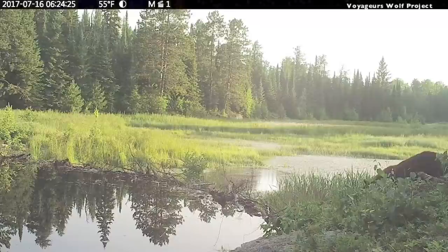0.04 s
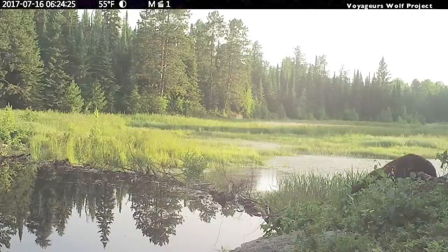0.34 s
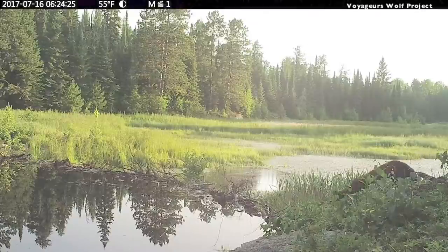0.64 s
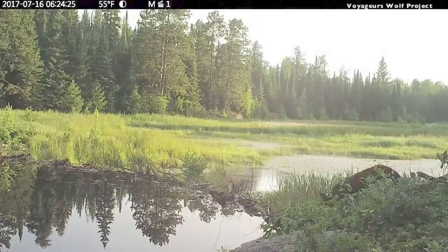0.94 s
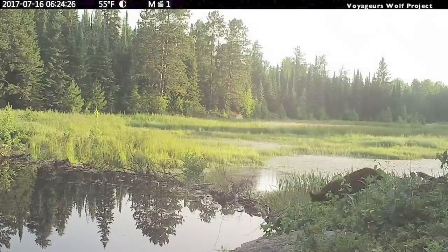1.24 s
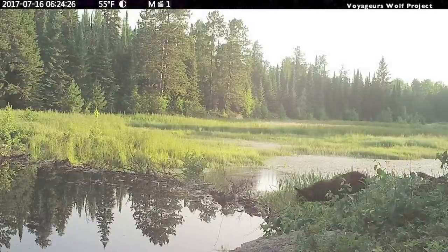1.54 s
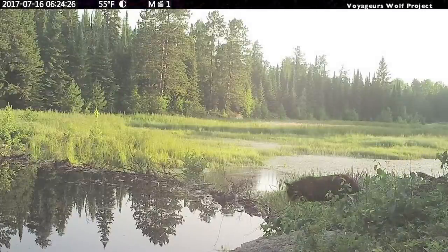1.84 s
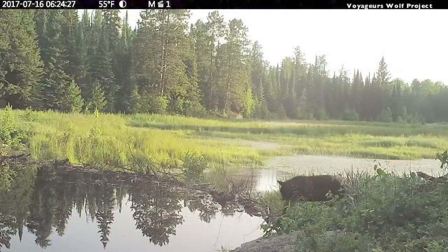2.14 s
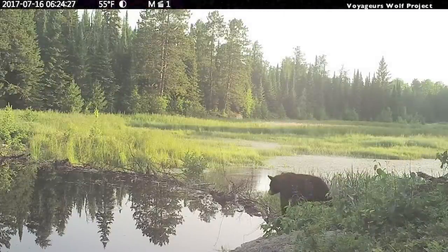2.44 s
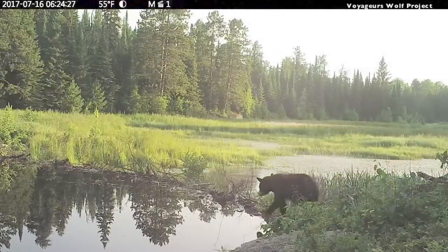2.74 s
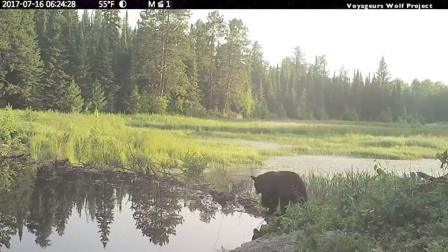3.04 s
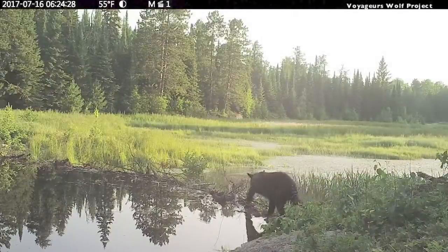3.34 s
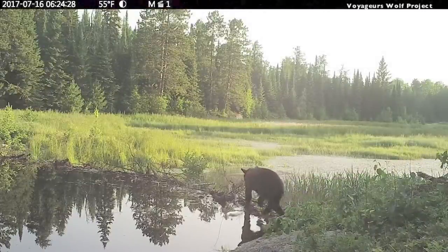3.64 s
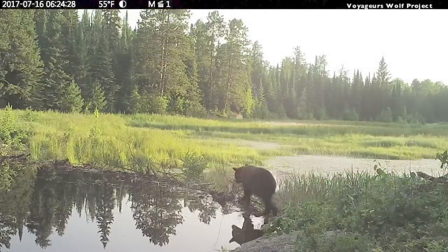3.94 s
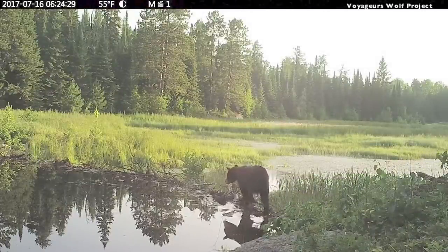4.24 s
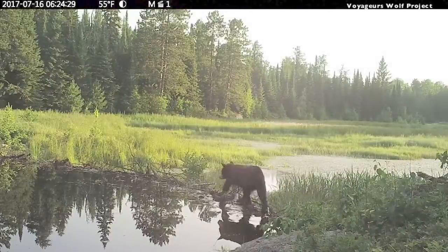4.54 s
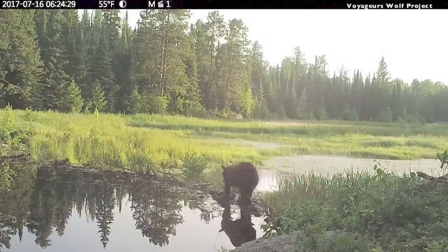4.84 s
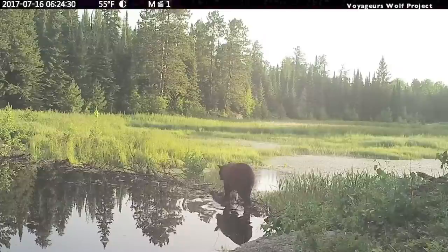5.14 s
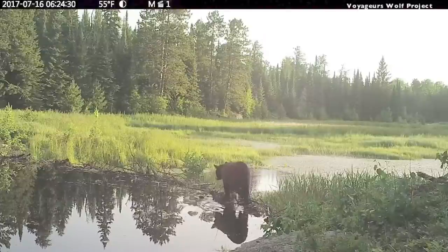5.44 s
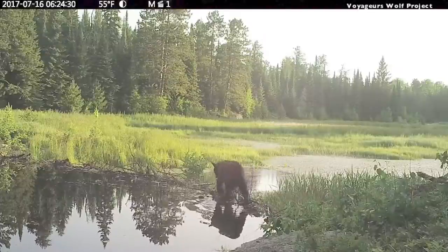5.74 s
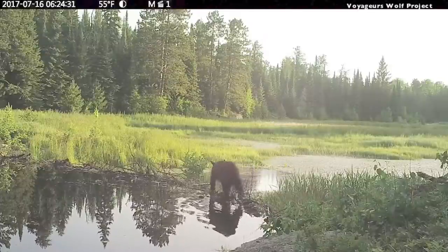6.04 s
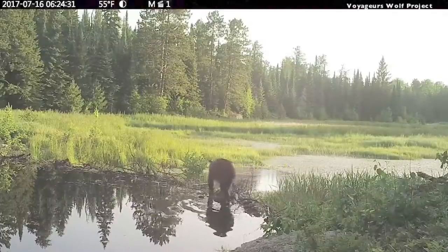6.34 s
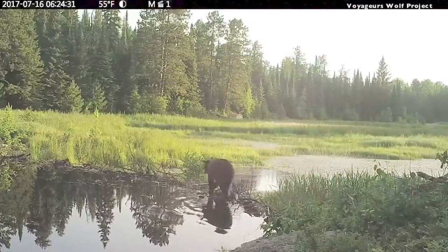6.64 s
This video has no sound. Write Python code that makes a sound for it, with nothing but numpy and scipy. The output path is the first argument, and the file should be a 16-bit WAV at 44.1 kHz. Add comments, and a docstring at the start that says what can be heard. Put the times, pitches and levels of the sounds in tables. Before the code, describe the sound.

A bear pushes through brush and wades into shallow water, with one loud branch crack, rustles and soft plops, as birds chirp over hiss.

```python
"""A branch cracks loudly and the forest answers as a bear pushes through brush into a pond's shallows.
Tearing fibres ring the twigs, stems flick against fur, and paws stir up bubbles and plop in the water.
A small bird twitters very high nearby; another whistles far off, blurred by the trees.
Under it all lie still air and the microphone hiss and faint whine of a small outdoor camera."""
import sys
import numpy as np
from scipy import signal
from scipy.fft import rfft, irfft
from scipy.io import wavfile
from scipy.ndimage import map_coordinates

SR = 44100
rng = np.random.default_rng(int(sys.argv[2]) if len(sys.argv) > 2 else 0)


def store_pcm(level_fs):
    """Save levels as 16-bit WAV."""
    pcm = np.round(np.clip(level_fs, -1, 1) * 32767).astype(np.int16)
    wavfile.write(sys.argv[1], SR, np.atleast_2d(pcm).T)


N = 304290
TIME = np.arange(N) / SR


def snap(level_db, tear_s, body_db, top_db, splinter_db=-8, knock_db=-11, ragged_db=2.5):
    """A ragged burst of a few milliseconds, as when fibres tear unevenly and ring the wood."""
    # wood resonances of the bright crack, before tuning to the twig: pitch_hz, width_hz, gain_db
    crack_modes = [(5445, 590, 1.5), (5370, 510, -3), (6330, 760, 1), (7250, 490, 4.5), (7760, 490, 0)]
    # wood resonances of the low knock: pitch_hz, width_hz, gain_db
    knock_modes = [(1310, 270, -15), (1960, 670, -1.5), (2550, 320, 4.5), (3700, 2100, -6)]
    t = TIME[:2048]
    jerks = np.interp(t, t[::48], rng.standard_normal(len(t[::48])))
    tearing = t / tear_s * np.exp(-t / tear_s) * from_db(ragged_db * jerks)
    fibres = rng.standard_normal((3, len(t))) * tearing
    tuning = (5800 + 23.5 * (-16.5 - level_db)) / 6050  # thinner twigs break more quietly, ring higher
    ring = resonate(fibres[0], crack_modes * np.array([tuning, 1, 1]))
    crack = band(ring + from_db(splinter_db) * fibres[0], 3490, 7370)
    knock = band(resonate(fibres[1], knock_modes) + from_db(knock_db) * fibres[1], 1180, 3800)
    crisp = band(fibres[2], 6200, 14200)
    wood = rms_one(crack) + from_db(body_db) * rms_one(knock) + from_db(top_db) * rms_one(crisp)
    return from_db(level_db) * wood * np.sqrt(0.0043 / t[-1])  # level as if packed into 4.3 ms


def snaps():
    """Sharp cracks, snaps and a splash-like burst that stand out of the rustle."""
    # sharp bursts: start_s, level_db, rise_s, body_db, top_db (the last two relative to level_db)
    bursts = [(1.867, -17, 0.0012, -12.5, -30), (2.4804, -41, .0008, -12, -12),
              (2.5882, -50, 0.00049, -9, -19), (2.739, -51.5, 0.00066, -16, -14),
              (3.403, -52.5, 0.00073, -1.5, -22), (3.4525, -50, .001, -12, -19),
              (3.6382, -45.5, 0.00044, -16, -6), (3.8733, -46.5, .0008, -22, -11),
              (4.194, -35, 0.0056, -11.5, -16), (4.266, -37, .003, -5, -20),
              (4.3862, -46.5, 0.00089, -19, -19), (4.7943, -43.5, .002, -11, -15),
              (4.8903, -45, 0.0011, -6, -4), (4.956, -53.5, .001, 0, -19), (4.9722, -42, 0.0011, -29, -12),
              (5.021, -47.5, 0.0013, -7, -8), (5.1477, -44.5, .0007, -20, -28),
              (5.1528, -41.5, 0.00082, -13, -24), (5.16, -45.5, 0.00064, -15, -19),
              (5.2825, -49, .001, -9, -21), (5.3996, -50, .001, -22, -24), (5.8024, -44, 0.0016, -12, -25),
              (6.1597, -48.5, .0008, -24, -26), (6.234, -50.5, 0.00058, -17, -20),
              (6.3325, -51, 0.0012, -7, -14), (6.659, -45, .0008, -24, -9), (6.725, -45, 0.0026, -13, -15),
              (6.857, -41.5, 0.00058, -12, -7), (6.872, -41.5, 0.00078, -24, -7),
              (6.8947, -35, 0.00052, -8, -9.5)]
    out = np.zeros(N)
    for start_s, level_db, rise_s, body_db, top_db in bursts:
        add(out, start_s, snap(level_db, rise_s, body_db, top_db))
    return panned(out, 0.5)


def rustle():
    """Leaves and stems flick against the fur: a spray of miniature snaps."""
    flicks = grains(per_s=1600, spread_db=4.5)
    ticks = grains(per_s=600, spread_db=4.0)
    leaves = rms_one(band(flicks, 5570, 7620) + from_db(-14.5) * band(flicks, 3300, 11000, order=1))
    stems = rms_one(resonate(ticks, [(2450, 380, -1.4), (3800, 490, -1.9), (4790, 530, 1.5)]))
    return rms_one(leaves + from_db(-6.5) * stems)


def water(slosh_gain, plop_db=6.5, shed_db=-4.5, plop_t60_s=0.045):
    """Single plops over a churn of small bubbles round the legs."""
    # air pockets closing under the paws: start_s, pitch_hz, level_db (before plop_db or shed_db)
    plops = [(4.271, 1100, -45.5), (4.758, 1020, -49), (5.005, 1020, -51), (5.011, 1236, -50),
             (5.023, 1317, -48.5), (5.151, 573, -49), (5.365, 517, -51.5), (5.683, 1136, -57),
             (5.94, 550, -50.5), (5.987, 1100, -55), (6.312, 540, -51.5)]
    churn = resonate(grains(per_s=350, spread_db=6.0), [(508, 76, -3), (1070, 280, -8.5), (1373, 214, -8)])
    out = slosh_gain * rms_one(churn)
    for start_s, pitch_hz, level_db in plops:
        add(out, start_s, from_db(level_db + plop_db) * bubble(pitch_hz, plop_t60_s))
        for late, smallness in rng.random((3, 2)):  # the pocket sheds smaller and larger bubbles
            shed = bubble(pitch_hz * (0.86 + 0.4 * smallness), plop_t60_s / 2)
            add(out, start_s + 0.032 * late, from_db(level_db + shed_db) * shed)
    return panned(out, 0)


def bubble(pitch_hz, t60_s, rise=0.024):
    """A damped tone that rises as the bubble nears the surface."""
    t = TIME[:SR // 8]
    envelope = from_db(-60 * t / t60_s) * (1 - np.exp(-t / .001))
    return envelope * np.sin(2 * np.pi * pitch_hz * t * (1 + rise * t / t60_s))


def gait(reach_s=.6):
    """Gains of rustle and slosh: each step swells over the wading; the water is slower to settle."""
    # paws coming down: peak_s, rustle_db, slosh_db
    steps = [(3.0, -81, -65.5), (3.33, -66, -64.5), (3.79, -55.5, -57.5), (4.23, -53.5, -60.5),
             (4.79, -56, -67), (5.0, -52.5, -77), (5.38, -52, -64), (5.66, -79, -62), (5.9, -79, -66),
             (6.15, -58, -79), (6.3, -64, -64), (6.54, -54, -62), (6.73, -57.5, -62), (6.89, -54, -70)]
    # leaves dragging along fur and water still stirred between steps: time_s, rustle_db, slosh_db
    wading = [(0, -83, -64), (.5, -65, -68), (.8, -73, -67), (1.3, -70, -68.5), (2.3, -80, -73),
              (2.6, -68, -70), (4.5, -65.5, -85), (5.5, -63, -66), (6.9, -60, -72)]
    rustle_power, slosh_power = from_db(in_time(wading)) ** 2
    brushing = swell(reach_s, attack_s=0.072, release_s=0.07)
    surge = swell(reach_s, attack_s=0.068, release_s=0.13)
    for peak_s, rustle_db, slosh_db in steps:
        add(rustle_power, peak_s - reach_s, (from_db(rustle_db) * brushing) ** 2)
        add(slosh_power, peak_s - reach_s, (from_db(slosh_db) * surge) ** 2)
    return np.sqrt(rustle_power), np.sqrt(slosh_power)


def near_bird():
    """High notes are thin and pure; lower ones are harsh chips with a ringing tail."""
    # harsh chips, all of one shape: start_s, level_db (before the mix gains)
    chip_cues = [(.414, -52.5), (1.013, -51.5), (4.159, -48.5), (6.41, -55)]
    whistles = panned(song(whistle_notes(), waver=0.0079, flutter_db=4.0), -5.5)
    chip_hz = arch(length_s=.031, crest_hz=6780, fall_hz=1480)
    chip_notes = [(start_s, chip_hz, level_db) for start_s, level_db in chip_cues]
    chips = panned(song(chip_notes, waver=0.072, flutter_db=3.5), 1.9)
    direct = from_db(1) * whistles + from_db(4) * chips
    leaf_echo = from_db(-7) * scatter(whistles, build_s=.003, t60_s=.08)
    chip_tail = from_db(3.5) * band(scatter(chips, build_s=0.0022, t60_s=0.25), 4500, 9200, order=1)
    return direct + leaf_echo + chip_tail


def whistle_notes(stray_hz=130, note_s=.052, solo_max_s=.075):
    """A short whistle is one arch; a long one is a twitter of arches that stray a little in pitch."""
    # the near bird's whistles: start_s, length_s, crest_hz, fall_hz, level_db (before the mix gains)
    whistles = [(0.554, 0.17, 8370, 500, -65.5), (1.41, 0.1, 8600, 1000, -64),
                (1.826, 0.037, 8660, 700, -61), (2.018, 0.078, 8680, 600, -61.5),
                (2.153, 0.14, 8520, 300, -63), (3.085, 0.04, 8400, 900, -65.5),
                (3.689, 0.038, 8170, 2000, -54), (3.75, 0.043, 8340, 1990, -48.5),
                (3.816, 0.05, 8370, 1250, -47.5), (3.891, 0.063, 8250, 755, -51),
                (3.936, 0.06, 8000, 794, -45.5), (4.041, 0.038, 8300, 200, -55),
                (4.07, 0.051, 8020, 300, -47.5), (4.122, 0.04, 7970, 650, -48),
                (4.817, 0.026, 8100, 300, -59), (5.183, 0.33, 7870, 600, -68),
                (5.844, 0.036, 7620, 550, -58.5), (6.368, .027, 8200, 500, -63)]
    notes = []
    for start_s, length_s, crest_hz, fall_hz, level_db in whistles:
        count = 1 if length_s < solo_max_s else round(length_s / note_s)
        for k in range(count):
            stray = stray_hz * rng.standard_normal() * (count > 1)
            path_hz = arch(length_s / count, crest_hz + stray, fall_hz)
            notes.append((start_s + k * length_s / count, path_hz, level_db))
    return notes


def arch(length_s, crest_hz, fall_hz, crest_at=0.246):
    """The near bird's pitch: a slight rise to the crest, then an ever steeper fall."""
    return crest_hz - fall_hz * ((progress(length_s) - crest_at) / (1 - crest_at)) ** 2


def far_bird(slur_s=.04, slur_db=-68.5, held_start_s=1.19, held_s=.22, held_hz=4080, held_db=-75.5):
    """Straight slurs and one held note, blurred by the trees between."""
    # slurs up or down: start_s, middle_hz, glide_hz
    slurs = [(.5, 3480, -1000), (1.415, 3300, -400), (1.62, 3290, 600), (1.675, 3500, -300),
             (2.365, 3460, 500), (2.51, 3400, -500), (3.563, 3450, 830), (4.325, 3900, 500),
             (4.449, 3930, -740)]
    glide = progress(slur_s) - .5
    notes = [(start_s, middle_hz + glide_hz * glide, slur_db) for start_s, middle_hz, glide_hz in slurs]
    held_note = (held_start_s, np.full(round(held_s * SR), held_hz), held_db)
    held = song([held_note], waver=0.0068, flutter_db=3.0)
    calls = panned(song(notes, waver=0.03, flutter_db=5.0) + held, 0)
    return from_db(3) * calls + from_db(-5) * scatter(calls, build_s=0.0091, t60_s=0.33)


def song(notes, waver, flutter_db, taper=0.49):
    """Each note is a whistle that swells and fades, trembling in pitch and level."""
    out, tremble, flutter = np.zeros(N), drift(580), drift(130)
    for start_s, path_hz, level_db in notes:
        span = round(start_s * SR) + np.arange(len(path_hz))
        envelope = np.abs(np.sin(np.linspace(0, np.pi, len(path_hz)))) ** taper
        loudness = envelope * from_db(flutter_db * flutter[span])
        phase = 2 * np.pi * np.cumsum(path_hz * (1 + waver * tremble[span])) / SR
        add(out, start_s, from_db(level_db) * rms_one(loudness * np.sin(phase)))
    return out


def scatter(x, build_s, t60_s):
    """A dense tail that builds and dies away, different on each side; unit gain."""
    t = TIME[:SR // 2]
    envelope = from_db(-60 * t / t60_s) * (1 - np.exp(-(t / build_s) ** 2))
    echoes = rng.standard_normal((2, len(t))) * envelope
    echoes /= np.sqrt(np.sum(echoes ** 2, axis=1, keepdims=True))
    return signal.fftconvolve(x, echoes, axes=1)[:, :N]


def air(hiss_db=-51, whine_db=-81):
    """A steady bed of noise, coloured by the camera's housing, with a faint whine of electronics."""
    # tone of still air and microphone hiss: frequency_hz, relative_db
    spectrum = [(12, -46), (20, 1), (31, -8), (54, -11.5), (266, -22), (519, -26), (906, -27.5),
                (1130, -24.5), (1920, -31), (2210, -30.5), (4430, -35), (6360, -34.5), (8880, -37),
                (14300, -40.5), (15500, -44.5)]
    # how alike the two sides are: frequency_hz, correlation
    likeness = [(20, -0.5), (60, .5), (150, 0.2), (500, 0.19), (1300, 0.41), (3000, 0.02), (14000, 0.19)]
    # stereo balance: frequency_hz, left_over_right_db
    lean = [(40, 0.5), (200, -3.5), (700, -2), (2400, -1.5), (6000, 0), (15000, -1)]
    hz = np.maximum(np.arange(N // 2 + 1) * SR / N, 1)
    mid, side = rfft(rng.standard_normal((2, N)))
    alike = np.clip(at_hz(likeness, hz), -1, 1)
    sides = np.array([[1], [-1]])
    noise = np.sqrt(1 + alike) * mid + sides * np.sqrt(1 - alike) * side
    colour = from_db(at_hz(spectrum, hz) + sides * at_hz(lean, hz) / 2)
    hiss = rms_one(irfft(colour * noise, N))
    housing = resonate(hiss, [(477, 133, -5.5), (1210, 870, -16), (6600, 1400, -6.5)])
    whine = sum(np.sqrt(2) * np.sin(2 * np.pi * f * TIME + .5 * drift(21)) for f in (9840, 9800))
    return from_db(hiss_db) * (hiss + housing) + from_db(whine_db) * whine


def grains(per_s, spread_db):
    """Random tiny clicks of very uneven size that come in clumps."""
    sizes = from_db(spread_db * np.minimum(rng.exponential(1, N), 4)) * rng.choice([-1, 1], N)
    return sizes * (rng.random(N) < per_s * from_db(3 * drift(35)) / SR)


def resonate(x, modes):
    """Parallel resonances (pitch_hz, width_hz, gain_db) with alternating signs."""
    out = 0
    for k, (pitch_hz, width_hz, gain_db) in enumerate(modes):
        radius = np.exp(-np.pi * width_hz / SR)
        feed = np.array([1, 0, -1]) * (1 - radius ** 2) / 2
        feedback = [1, -2 * radius * np.cos(2 * np.pi * pitch_hz / SR), radius ** 2]
        out = out + (-1) ** k * from_db(gain_db) * signal.lfilter(feed, feedback, x + 1e-18)
    return out


def band(x, low_hz, high_hz, order=2):
    """Butterworth band-pass."""
    sos = signal.butter(order, [low_hz, min(high_hz, .47 * SR)], "band", fs=SR, output="sos")
    return signal.sosfilt(sos, x)


def swell(reach_s, attack_s, release_s):
    """An envelope that grows exponentially to 1 at its middle and dies away."""
    t = np.arange(-reach_s, reach_s, 1 / SR)
    return np.exp(-np.maximum(-t / attack_s, t / release_s))


def drift(per_s):
    """A random wander of unit rms, heading for a new value per_s times a second."""
    knots = rng.standard_normal(4096)
    return rms_one(np.interp(TIME * per_s, np.arange(len(knots)), knots))


def progress(length_s):
    """From 0 to 1 over a note."""
    return np.linspace(0, 1, round(length_s * SR))


def in_time(rows):
    """Each column of a curve at every sample."""
    time_s, *columns = np.transpose(rows)
    return [np.interp(TIME, time_s, column) for column in columns]


def at_hz(points, hz):
    """Read a spectrum on a log-frequency axis."""
    knots_hz, values = np.transpose(points)
    return np.interp(np.log(hz), np.log(knots_hz), values)


def from_db(db):
    """Decibels to gain."""
    return 10 ** (np.asarray(db) / 20)


def rms_one(x):
    """Scale to unit rms."""
    return x / np.sqrt(np.mean(x ** 2) + 1e-20)


def panned(x, db):
    """Mono to stereo, the left side db above the right."""
    return x * from_db([[db / 2], [-db / 2]])


def add(out, start_s, x):
    """Mix x into out from start_s on."""
    i = max(round(start_s * SR), 0)
    out[..., i:i + x.shape[-1]] += x[..., :max(N - i, 0)]


def scene():
    """Bear and birds among the brush; leaves and trunks throw back the bear's noise."""
    # the bear's bearing: time_s, left_lag_samples
    bearing = [(0, 1), (2.5, 0.73), (4.3, 0), (6.9, 0.35)]
    left_lag, = in_time(bearing)
    rustle_gain, slosh_gain = gait()
    bear = snaps() + panned(rustle_gain * rustle(), 0.59) + water(slosh_gain)
    bear[0] = map_coordinates(bear[0], [np.arange(N) - left_lag], order=3)
    brush = from_db(-4) * scatter(bear, build_s=0.00086, t60_s=0.075)
    forest = from_db(-13) * band(scatter(bear, build_s=0.033, t60_s=0.48), 4000, 20000, order=1)
    return bear + brush + forest + near_bird() + far_bird() + air()


def record(dry, wake_s=0.13, fade_s=0.091, bias_start=0.046, settle_s=1.263, cutoff_hz=15500):
    """The camera fades in, its input bias settles, and the top is cut."""
    awake = np.clip((TIME - wake_s) / fade_s, 0, 1)
    bias_rest = np.array([[-0.036], [-0.034]])  # left, right
    bias = bias_rest + (bias_start - bias_rest) * np.exp(-(TIME - wake_s - fade_s) / settle_s)
    low_pass = signal.ellip(10, .1, 80, cutoff_hz, fs=SR, output="sos")
    return signal.sosfilt(low_pass, awake * (dry + bias))


dry = scene()
out = record(dry)
store_pcm(out)
```